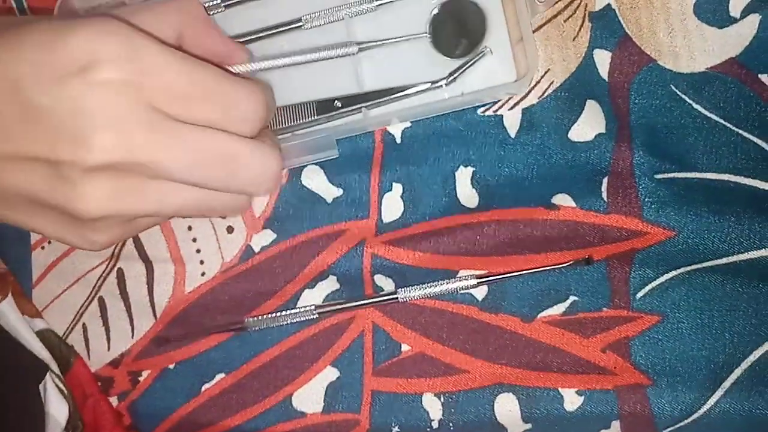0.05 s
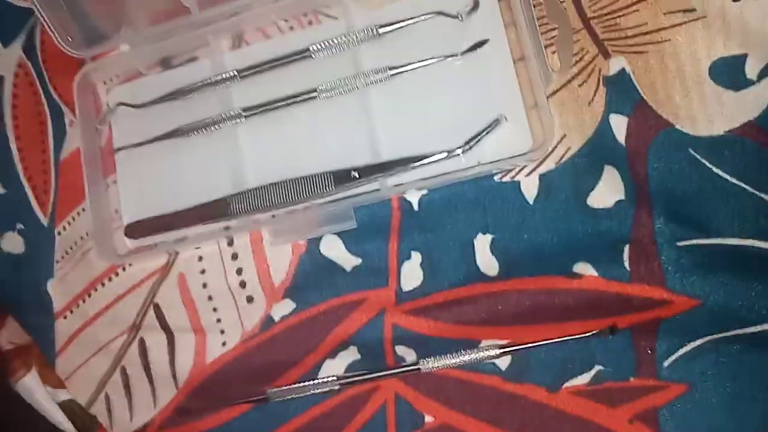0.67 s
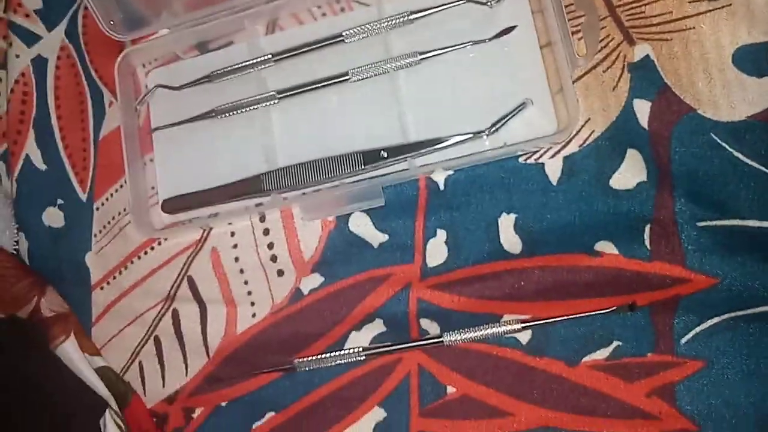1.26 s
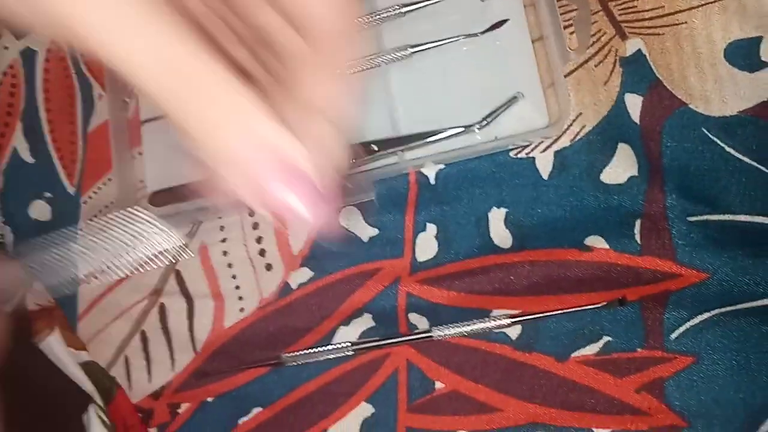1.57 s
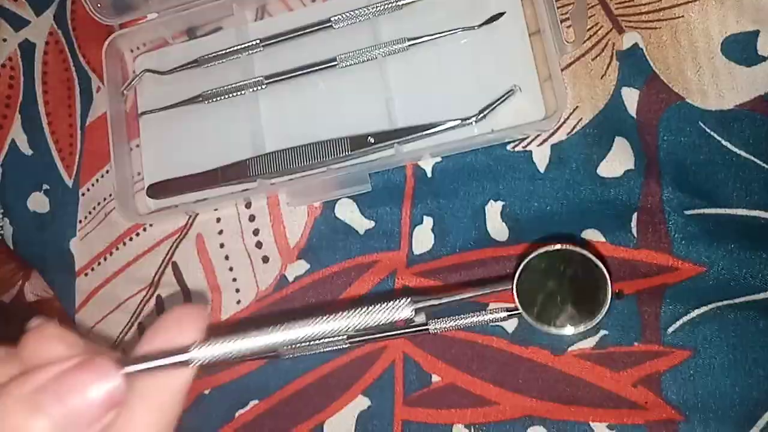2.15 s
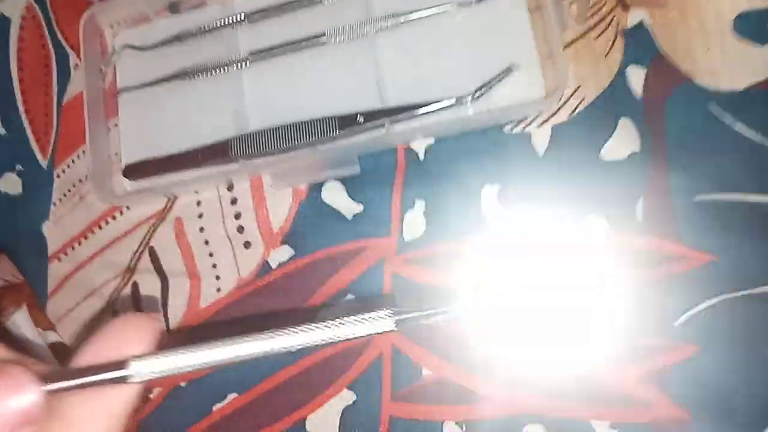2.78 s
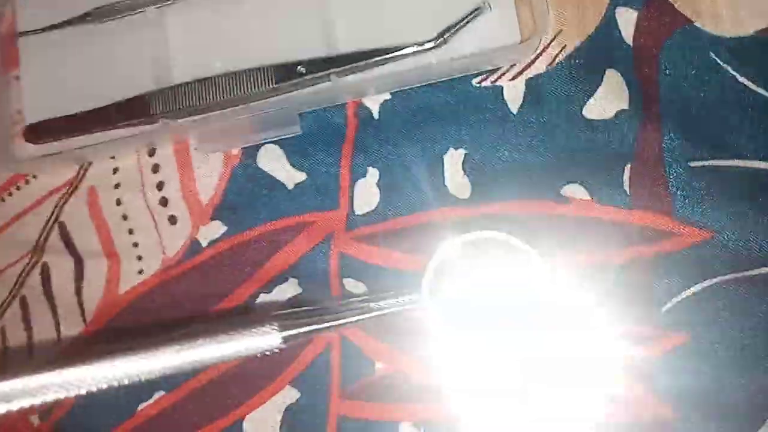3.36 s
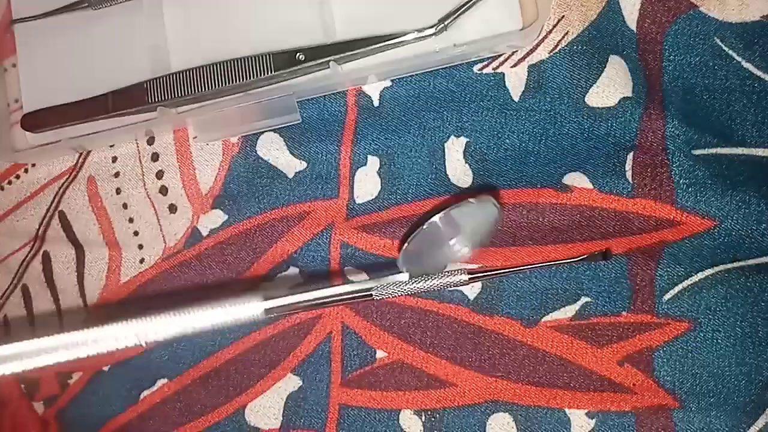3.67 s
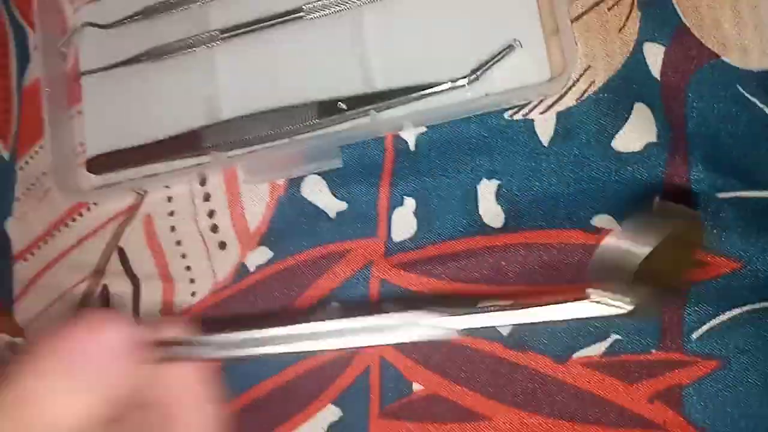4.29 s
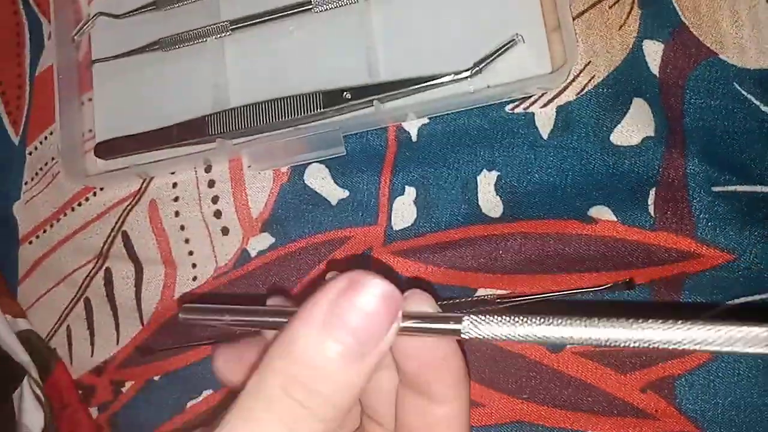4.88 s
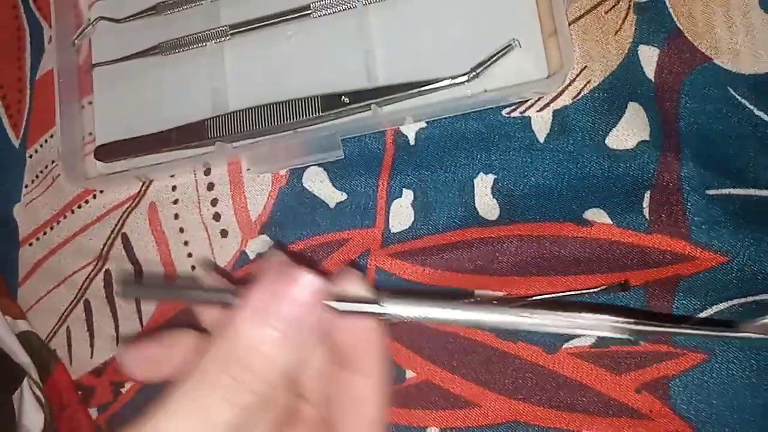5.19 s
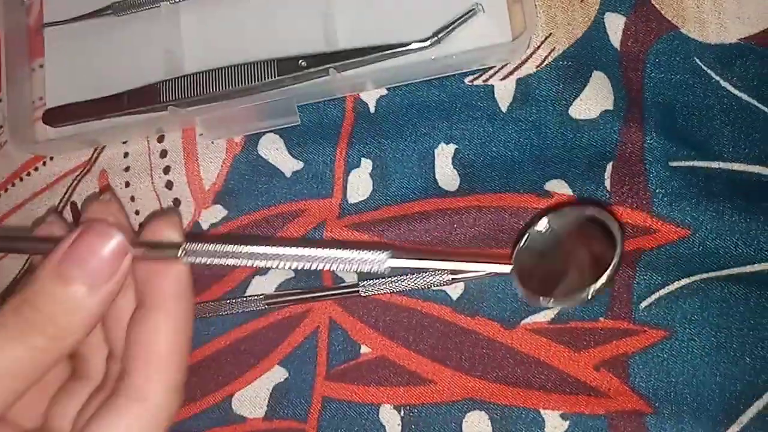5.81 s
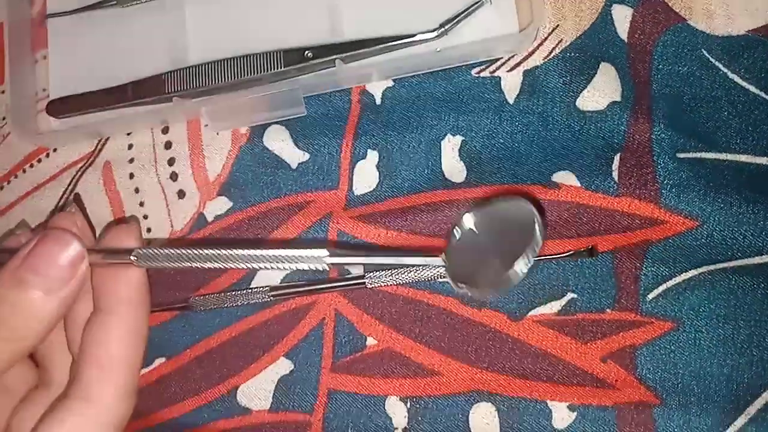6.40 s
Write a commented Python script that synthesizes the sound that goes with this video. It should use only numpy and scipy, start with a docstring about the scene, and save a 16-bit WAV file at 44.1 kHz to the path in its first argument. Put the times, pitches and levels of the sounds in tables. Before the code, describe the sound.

A plastic case snaps open, then steel dental tools knock, clink and tick as they are handled, over a steady hum and hiss.

```python
"""A plastic lid snaps twice as a case of steel dental tools is opened in a small, bare room.
Then the case knocks, the tools tap and a mirror's handle ticks: each impact excites the
resonances of a body and reverberates. Fingers rub on the knurled handle with a friction noise,
and a hand bumps softly on cloth. A mains hum and a steady hiss lie under it all."""
import sys
import numpy as np
from scipy import signal
from scipy.fft import rfft, irfft, next_fast_len
from scipy.io import wavfile
from scipy.ndimage import map_coordinates

SR = 44100
rng = np.random.default_rng(int(sys.argv[2]) if len(sys.argv) > 2 else 0)


def persist_wave(psi):
    """Save psi, clipped to +-1, as 16-bit WAV."""
    counts = np.round(np.clip(psi, -1, 1) * 32767).astype(np.int16)
    wavfile.write(sys.argv[1], SR, np.atleast_2d(counts).T)


N = 293265


def amp(db):
    """Amplitude ratio of a level in decibels."""
    return 10 ** (np.asarray(db) / 20)


def unit(x):
    """Normalisation to rms 1."""
    return x / np.sqrt(np.mean(x ** 2) + 1e-20)


def along(points, hz):
    """Interpolation of (frequency [Hz], value) points on a logarithmic frequency axis."""
    freqs, values = np.transpose(points)
    return np.interp(np.log(hz + 1), np.log(freqs + 1), values)


def resonance_db(peaks, hz):
    """Resonance: each peak adds a Lorentzian curve to the gain in dB."""
    return sum(gain / (1 + (2 * (hz - centre) / width) ** 2) for centre, width, gain in peaks)


def ramp(centre_s, length_s):
    """Linear transition from 0 to 1."""
    return np.clip((np.arange(N) / SR - centre_s) / length_s + .5, 0, 1)


def wobble(rate):
    """Random modulation: a spline through `rate` Gaussian values a second."""
    knots = rng.standard_normal(int(N * rate / SR) + 4)
    return map_coordinates(knots, [np.arange(N) * rate / SR])


def filtered(x, response):
    """Zero-phase filtering by multiplication of the spectrum."""
    size = next_fast_len(len(x) + 8192)
    return irfft(rfft(x, size) * response(np.fft.rfftfreq(size, 1 / SR)), size)[:len(x)]


def noise(spectrum, peaks=()):
    """Spectral shaping of white noise, with optional resonances, at rms 1."""
    white = rng.standard_normal(N)
    return unit(filtered(white, lambda hz: amp(along(spectrum, hz) + resonance_db(peaks, hz))))


def minimum_phase(db):
    """Causality: a response with these gains whose ringing follows the blow."""
    cepstrum = irfft(np.log(amp(db)))
    half = len(cepstrum) // 2
    cepstrum[1:half] *= 2
    cepstrum[half + 1:] = 0
    return np.exp(rfft(cepstrum))


def add(track, onset_s, sound):
    """Superposition of a sound on the track."""
    start = max(round(onset_s * SR), 0)
    track[start:start + len(sound)] += sound[:max(N - start, 0)]


# spectra of the hiss and its fine top: (frequency [Hz], relative spectral density [dB])
HISS_SPECTRUM = [(20, -9), (38, -12.5), (70, -7), (200, -2), (480, -8), (800, -7), (1100, -2), (1500, -1.5),
                 (1900, -1), (2400, 2.5), (3700, .5), (4300, -3.5), (5400, -18), (6200, -20), (8000, -47.5)]
TOP_SPECTRUM = [(3000, -22), (5500, 5), (6500, 15.5), (8000, -7), (10500, -6.5), (13200, 4), (14200, -6),
                (15500, -19)]
# hollow notes in the hiss: (frequency [Hz], bandwidth [Hz], gain [dB])
HISS_PEAKS = [(1384, 27, 10), (1622, 110, 6), (2210, 27, 5), (2400, 20, 4.5), (2904, 47, 4.5),
              (3240, 110, 2), (3540, 56, 6), (3745, 62, 3.5), (3930, 130, 3.5)]

def hiss(hiss_db=-41, top_db=-76, hiss_rise_db=1, top_rise_db=5.5):
    """Broadband noise, coloured by resonances, brightens once and stays so."""
    brightening = ramp(centre_s=4.43, length_s=0.56)
    hollow = amp(hiss_db + hiss_rise_db * brightening) * noise(HISS_SPECTRUM, HISS_PEAKS)
    top = amp(top_db + top_rise_db * brightening) * noise(TOP_SPECTRUM)
    return hollow + top


# mains harmonics: (frequency [Hz], level [dB])
HUM_HARMONICS = [(120, -41), (240, -60), (360, -56.5), (420, -69.5), (480, -67), (540, -65.5), (600, -68.5)]

def hum(waver_db=0.67, third_hz=180, third_db=-54.5, swell_db=4):
    """A harmonic series led by twice the mains frequency; the third harmonic rises once and stays."""
    track, t = np.zeros(N), np.arange(N) / SR
    third = (third_hz, third_db + swell_db * ramp(centre_s=2.1, length_s=0.4))
    for hz, db in [*HUM_HARMONICS, third]:
        amplitude = np.sqrt(2) * amp(db + waver_db * wobble(3.63))
        track += amplitude * np.sin(2 * np.pi * (hz * t + rng.random()))
    return track


# the hand lands on cloth: (time [s], level [dB], centre frequency [Hz])
CLOTH_BUMPS = [(.008, -40, 428), (.48, -38.5, 215), (.89, -47, 653), (3.27, -45, 392), (3.561, -45.5, 450),
               (3.96, -42, 256), (4.39, -47, 402), (5.465, -41, 240), (5.516, -43, 517), (6.57, -43.5, 513)]

def cloth_bumps(t60=0.27, q=2.2):
    """A soft impact excites only low frequencies: a band of noise in exponential decay."""
    track, t = np.zeros(N), np.arange(SR // 3) / SR
    for onset, db, centre in CLOTH_BUMPS:
        white = rng.standard_normal(len(t))
        thud = unit(filtered(white, lambda hz: 1 / (1 + (q * (hz - centre) / centre) ** 4)))
        envelope = amp(db - 60 * t / t60) * (1 - np.exp(-t / 0.001))
        add(track, onset, envelope * thud)
    return track


# finger strokes on the handle: (time [s], duration [s], level [dB])
FINGER_STROKES = [(2.946, 0.053, -41), (3.528, 0.17, -47), (3.9, 0.19, -46), (4.372, 0.16, -37.5),
                  (4.538, 0.094, -40), (5.878, 0.1, -37)]
# friction noise: (frequency [Hz], relative spectral density [dB])
FRICTION_SPECTRUM = [(200, -11), (500, -1.5), (900, -7.5), (1600, -0.5), (3800, 1), (4600, -12.5),
                     (6200, -24), (8000, -57), (15000, -50)]

def finger_rubs(grain_db=2.5):
    """Sliding friction of skin on knurling makes short swells of finely grained noise."""
    t = np.arange(N) / SR
    swells = sum(amp(db) * np.exp(-(2 * (t - s) / length) ** 2) for s, length, db in FINGER_STROKES)
    return swells * unit(noise(FRICTION_SPECTRUM) * amp(grain_db * wobble(400)))


# the first contact, a louder second contact 4 ms later, then reflections from nearby surfaces:
# (delay [s], gain [dB], low-pass cutoff [Hz])
EARLY_ARRIVALS = [(0, -1.5, 12000), (.0044, 5, 7000), (.0062, -2, 4000), (0.0141, 1.5, 1900),
                  (0.017, -32, 3000)]
# decay of the room by 60 dB: (frequency [Hz], reverberation time [s])
ROOM_T60 = [(200, 0.47), (500, 0.31), (1200, 0.25), (4000, 0.24), (12000, 0.29)]

def arrivals(hz, tail_db, scatter_db, scatter_t60=0.059):
    """Delay and reverberation as two spectra: a double contact with reflections, and a diffuse tail."""
    t = np.arange(SR // 2) / SR
    bands, frames, grains = signal.stft(rng.standard_normal(len(t)), SR, nperseg=256)
    decay = amp(-60 * frames / along(ROOM_T60, bands)[:, None])
    tail = signal.istft(grains * decay, SR, nperseg=256)[1][:len(t)]
    tail *= 1 - np.exp(-t / 0.015)
    scatter = rng.standard_normal(len(t)) * amp(-60 * t / scatter_t60) * (1 - np.exp(-t / 0.0019))
    early = amp(scatter_db) * rfft(scatter) / np.linalg.norm(scatter)
    for delay, db, cutoff in EARLY_ARRIVALS:
        lag = delay * rng.uniform(.95, 1.05)
        early += amp(db) * np.exp(-2j * np.pi * hz * lag) / (1 + 1j * hz / cutoff)
    return early, amp(tail_db) * rfft(tail) / np.linalg.norm(tail)


# a contact before the body colours it: (frequency [Hz], relative spectral density [dB])
CRACK_SPECTRUM = [(30, -55), (120, -16), (250, -14), (450, -8), (1200, 3.5), (2500, 8.5), (4100, -0.5),
                  (4650, -6), (5100, -16.5), (6400, -28.5), (7800, -48.5), (10000, -56.5), (13000, -47.5),
                  (15500, -60)]
# near sound against the tail: (frequency [Hz], gain [dB])
NEAR_GAIN = [(2000, -3.5), (3300, -3.5), (4100, 1.5), (4700, -4), (6000, -0.5), (12000, 0.5)]
# borders of the five bands of a body's balance: (frequency [Hz])
BAND_EDGES = [250, 700, 1800, 3000, 5000, 8000]

def impacts(events, modes, balance, tail_db, scatter_db, touch_db, tail_ring=0.71):
    """Impulse response: a dull first touch, then a crack, excites the body's modes and the room."""
    gain_db, lead_s = -9.0, 0.003523  # gain on all event levels; the touch's lead on the crack
    touch_hz, pivot_hz = 950, 1490
    track, hz = np.zeros(N), np.fft.rfftfreq(SR // 2, 1 / SR)
    crack_db, ring_db = along(CRACK_SPECTRUM, hz), resonance_db(modes, hz)
    near = minimum_phase(crack_db + ring_db + along(NEAR_GAIN, hz))
    # the tail gathers sound from all sides of the body, which evens out its peaks
    far = minimum_phase(crack_db + tail_ring * ring_db)
    touch = minimum_phase(touch_db - 10 * np.log10(1 + (hz / touch_hz) ** 4))
    centres = np.sqrt(np.multiply(BAND_EDGES[:-1], BAND_EDGES[1:]))
    for onset, db, hardness in events:
        early, tail = arrivals(hz, tail_db, scatter_db)
        crack = (near * early + far * tail) * np.exp(-2j * np.pi * hz * lead_s)
        spectrum = touch * near * early + crack
        # the body sets the balance; a harder blow tilts it towards the treble
        band_db = db + np.array(balance) + hardness * np.log2(centres / pivot_hz)
        band_power = np.histogram(hz, BAND_EDGES, weights=abs(spectrum) ** 2)[0]
        blow_db = np.interp(np.log(hz + 1), np.log(centres), band_db - 10 * np.log10(band_power))
        blow = irfft(spectrum * minimum_phase(blow_db + gain_db))
        add(track, onset - lead_s, blow[:SR // 3] * len(hz))
    return track


# ticks of the mirror's handle, and at 5.401 s a duller tap of tool on tool: (time [s], level [dB], hardness
# [dB/octave])
MIRROR_TICKS = [(4.287, -34.5, -1.1), (5.401, -39, -1.2), (5.446, -31, 0.4), (5.791, -35.5, .3)]
# its resonances and one antiresonance: (frequency [Hz], bandwidth [Hz], gain [dB])
MIRROR_MODES = [(474, 140, 14.5), (880, 140, -10.5), (1670, 65, 10), (2265, 73, 16), (2420, 120, 7),
                (3300, 45, 17), (3760, 76, 16.5), (4030, 59, 11.5), (4640, 27, 3)]
# its balance: (relative level [dB]) per band
MIRROR_BALANCE = (-1, -4, -2.6, -0.8, -18.5)

def mirror_ticks():
    """Light impacts, mostly ticks of the handle as it is turned, excite the modes of the mirror."""
    return impacts(MIRROR_TICKS, MIRROR_MODES, MIRROR_BALANCE, tail_db=10, scatter_db=6, touch_db=3.5)


# tool against tool: (time [s], level [dB], hardness [dB/octave])
TOOL_TAPS = [(4.771, -32.5, 1.1), (5.1155, -23.5, 1)]
# resonances of the tools: (frequency [Hz], bandwidth [Hz], gain [dB])
TOOL_MODES = [(484, 60, 10), (854, 51, 11), (1186, 35, 11.5), (1550, 40, 12), (1690, 130, 12),
              (2040, 34, 14), (2370, 260, 11.5), (3330, 39, 9), (4770, 50, 5)]
# their balance: (relative level [dB]) per band
TOOL_BALANCE = (-8.5, -1.5, -4.5, -11.5, -24.5)

def tool_taps():
    """Free vibration: colliding steel tools ring briefly at their natural frequencies."""
    return impacts(TOOL_TAPS, TOOL_MODES, TOOL_BALANCE, tail_db=10.5, scatter_db=6.5, touch_db=-16)


# hard contacts on the case: (time [s], level [dB], hardness [dB/octave])
CASE_KNOCKS = [(2.0405, -27.5, 1), (2.335, -25.5, 0), (2.619, -24, 0.1)]
# resonances of its tray: (frequency [Hz], bandwidth [Hz], gain [dB])
CASE_MODES = [(458, 85, 14), (517, 30, 8.5), (721, 49, 15), (850, 15, 10), (970, 28, 8.5), (1027, 55, 13),
              (1200, 19, 7), (1366, 104, 14), (1890, 41, 7.5), (2150, 67, 9.5), (2850, 70, 2),
              (3370, 40, 5), (3890, 44, 7.5), (3960, 120, 11.5)]
# its balance: (relative level [dB]) per band
CASE_BALANCE = (-6, -0.5, -6.5, -4, -22.5)

def case_knocks():
    """Damped resonance: the tray, loaded with tools, answers each blow with a knock."""
    return impacts(CASE_KNOCKS, CASE_MODES, CASE_BALANCE, tail_db=9.5, scatter_db=7, touch_db=3)


# snaps of the opening lid: (time [s], level [dB], hardness [dB/octave])
LID_SNAPS = [(.0615, -21, -0.5), (.4146, -16.5, -0.5)]
# its resonances, the widest its damped main panel mode: (frequency [Hz], bandwidth [Hz], gain [dB])
LID_MODES = [(491, 60, 9.5), (723, 48, 13), (853, 19, 12), (1015, 49, 15.5), (1218, 53, 13.5),
             (1280, 250, 5), (1375, 63, 13.5), (1605, 30, 13.5), (2190, 98, 12), (2380, 68, 11),
             (2600, 50, 11), (3720, 45, 8), (3966, 130, 13)]
# its balance: (relative level [dB]) per band
LID_BALANCE = (-11.5, -2, -6.5, -5, -24.5)

def lid_snaps():
    """Plate vibration: each snap excites the panel modes of the plastic lid."""
    return impacts(LID_SNAPS, LID_MODES, LID_BALANCE,
                   tail_db=7, scatter_db=2.5, touch_db=-14, tail_ring=0.54)


def scene():
    """Superposition of impacts, handling, hum and hiss in one channel."""
    contacts = lid_snaps() + case_knocks() + tool_taps() + mirror_ticks()
    return (contacts + finger_rubs() + cloth_bumps() + hum() + hiss())[None]


def record(dry):
    """Band limiting: an ideal low-pass filter removes the highest treble."""
    cutoff_hz = 15450
    return filtered(dry[0], lambda hz: hz < cutoff_hz)[None]


dry = scene()
out = record(dry)
persist_wave(out)
```